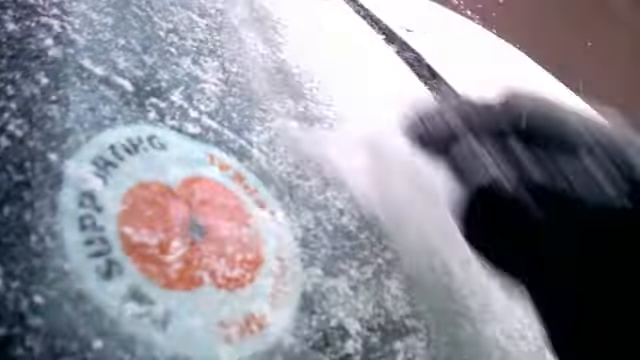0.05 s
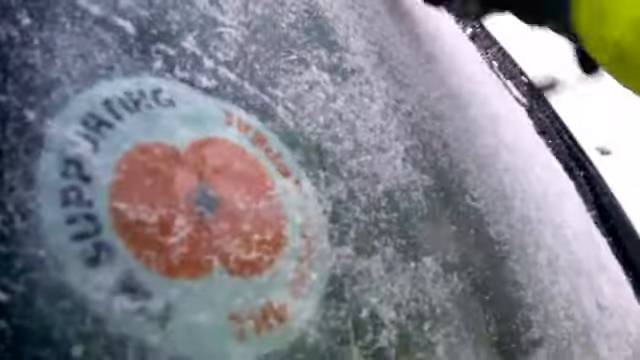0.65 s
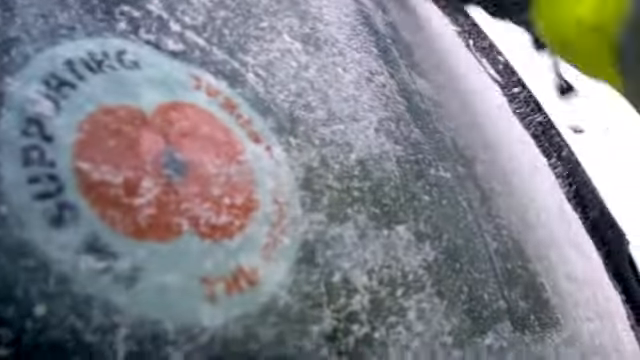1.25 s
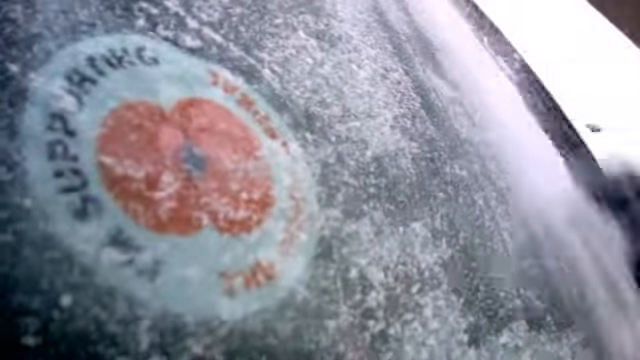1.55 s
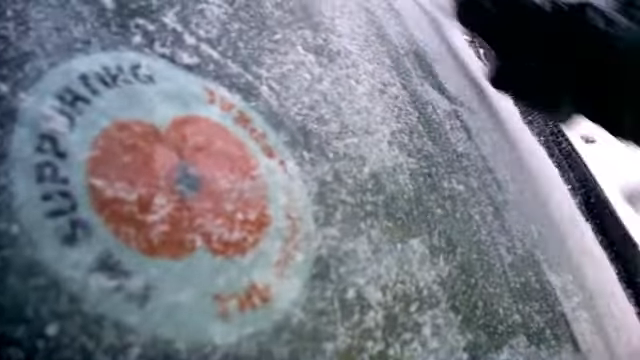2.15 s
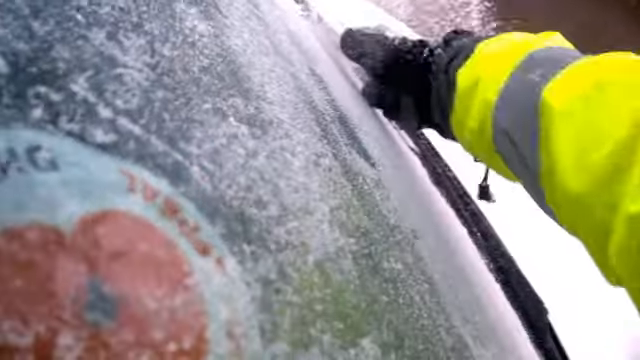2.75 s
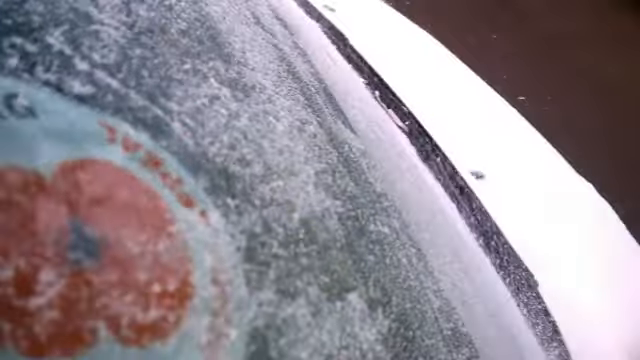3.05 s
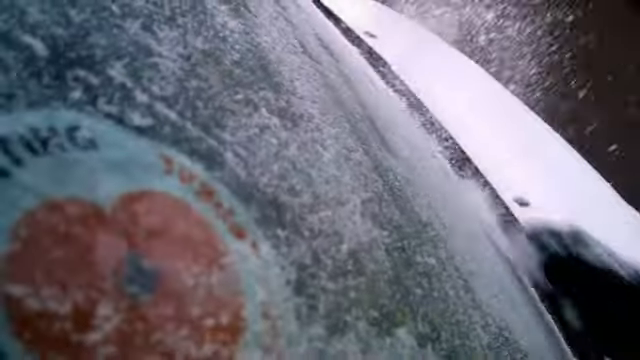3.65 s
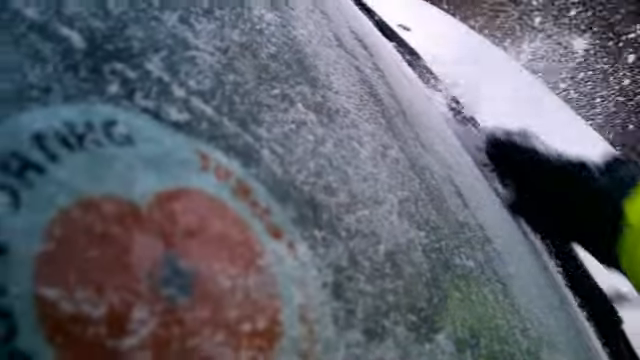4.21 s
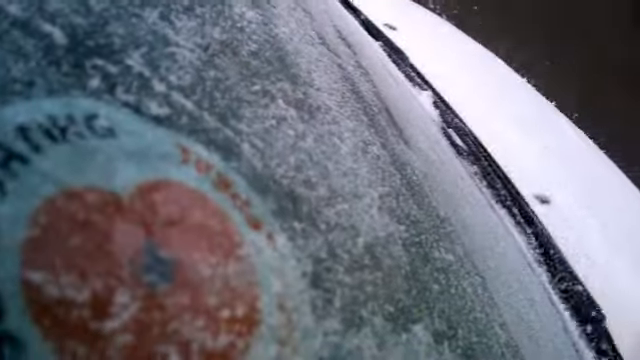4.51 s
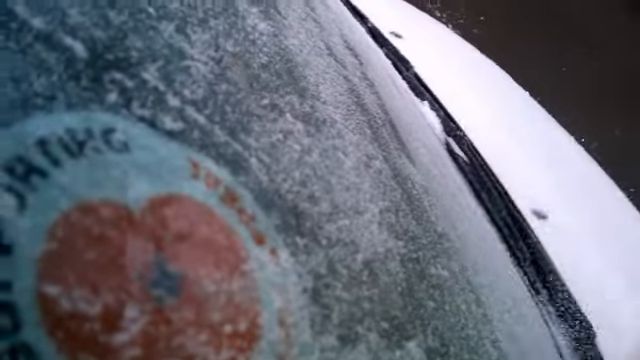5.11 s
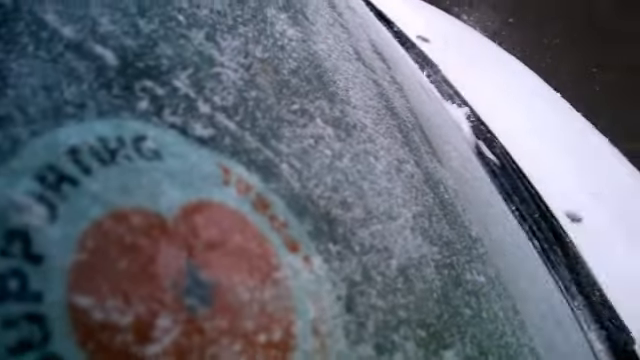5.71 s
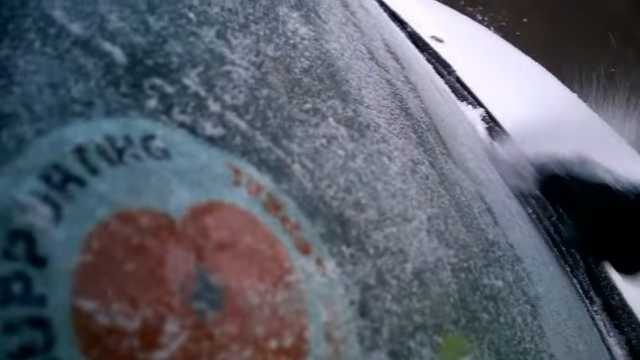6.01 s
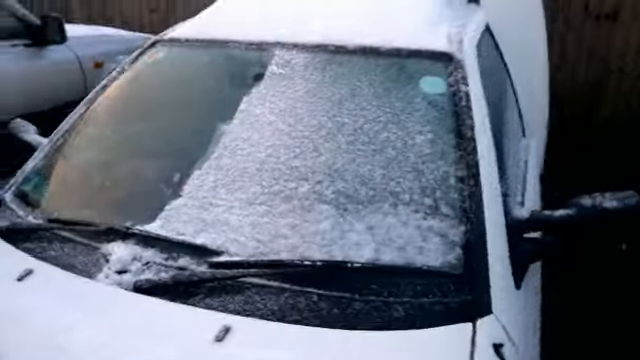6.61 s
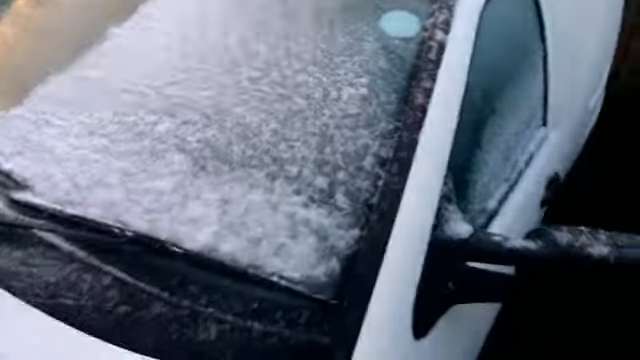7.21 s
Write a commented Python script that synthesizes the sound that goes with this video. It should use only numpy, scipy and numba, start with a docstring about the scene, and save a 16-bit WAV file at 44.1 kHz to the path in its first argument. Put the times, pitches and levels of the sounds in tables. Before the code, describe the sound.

A plastic scraper rasps frost off a windscreen in quick strokes and jabs, then stops, leaving the car's engine idling.

```python
"""Scraping frost off a windscreen

A plastic scraper works close by on an idling car: quick back-and-forth strokes, then grittier jabs. Countless
tiny breaks in the frost make the crunch and set the blade and the glass ringing. After six seconds the scene
changes: the scraping is gone and the engine is heard alone, from in front of the bonnet."""
import sys
import numpy as np
from scipy import signal
from scipy.fft import rfft, irfft
from scipy.io import wavfile
from scipy.ndimage import uniform_filter1d, map_coordinates
from numba import njit

SR = 44100
rng = np.random.default_rng(int(sys.argv[2]) if len(sys.argv) > 2 else 0)


def int16_out(signal):
    """Quantize to a 16-bit WAV file."""
    q = np.round(np.clip(np.atleast_2d(signal).T, -1, 1) * 32767)
    wavfile.write(sys.argv[1], SR, q.astype(np.int16))


N = 324576
TIME = np.arange(N) / SR

# the engine's two lowest tones: time_s, firing_tone_db, octave_db
ENGINE_HUM = [(0.5, -30, -29.5), (3.2, -36, -32.5), (6.03, -38, -33.5), (6.09, -38, -40), (6.52, -37, -49),
              (7.36, -32.5, -31.5)]
# its higher tones: multiple_of_firing_rate, by_windscreen_db, by_bonnet_db
ENGINE_OVERTONES = [(3, -49, -42), (4, -62, -44), (5, -59, -53), (6, -57, -59), (7, -57.5, -55),
                    (8, -54.5, -51), (9, -60, -54), (12, -55.5, -62), (14, -55, -53.5), (16, -55, -78)]
# tone colours (how strong the low and high parts are): pitch_hz, relative_db
WHIRR_COLOUR = [(80, -28), (200, -1.5), (420, -4), (720, -4.5), (1100, -4.5), (1700, -8), (2000, -14),
                (2400, -11), (3200, -18.5), (8000, -18), (12000, -19), (13200, -32), (15500, -33)]  # belts, fan and valves
RUMBLE_COLOUR = [(10, -8), (30, 16.5), (70, 3), (140, -11), (400, -13), (2000, -72)]
PUFF_COLOUR = [(30, 1), (90, -1), (220, -4.5), (500, -14), (2000, -57)]
KNOCK_COLOUR = [(50, -24), (140, 2), (280, -5), (600, -22), (2000, -60)]
FROST_STROKE_COLOUR = [(1500, -30), (3000, -8), (3900, 5), (4700, 3.5), (6000, -0.5), (7000, 0.5),
                       (7900, -3.5), (8900, 2.5), (10200, -2), (11300, 0.5), (12200, -5.5), (15500, -12.5)]
FROST_JAB_COLOUR = [(1500, -14.5), (3000, -10), (4000, 0.5), (5000, 6), (5700, 2.5), (6600, 2), (7500, 0),
                    (8500, 2.5), (10400, 0.5), (11400, -1), (12300, -6), (15500, -12.5)]
GLASS_STROKE_COLOUR = [(70, -19.5), (160, -23.5), (280, -7.5), (450, 0), (600, 1), (800, 7), (1080, -0.5),
                       (1400, -3), (1900, -6), (3500, -40)]
GLASS_JAB_COLOUR = [(70, -21), (160, -19), (260, -6), (420, -0.5), (620, -1.5), (830, 4), (1080, 2),
                    (1400, -4), (1900, -9.5), (3500, -47.5)]  # jabs press harder and bend the glass more
# short, single events: start_s, relative_db
AIR_PUFFS = [(.072, -11.5), (.099, -10), (.142, -11)]
SCRAPER_KNOCKS = [(4.79, -23.5), (4.806, -33)]  # against the foot of the windscreen
ICE_CHIPS = [(0.626, -7), (0.6474, -1.5), (3.563, -12), (3.8905, -15.5), (4.3088, -4), (4.3894, -4),
             (4.418, -6), (4.5351, -18), (4.7158, -7), (4.7372, -7), (4.7681, -12), (4.791, -14.5),
             (4.8043, -22), (4.8628, -26.5), (4.997, -21), (5.0205, -12.5), (5.051, -21), (5.594, -14)]  # lumps that crack off
# the grip tunes the blade's ring: time_s, pitch_hz, width_hz
BLADE_TUNING = [(1.2, 2040, 1460), (2.2, 2260, 1350), (2.9, 2380, 1220), (3.4, 2390, 1060),
                (3.7, 2480, 620), (5.15, 2470, 557), (5.63, 2830, 720), (6.05, 2450, 910)]
# In the three stroke tables, levels are relative; blade_db and glass_db set each part's share.
# long strokes up: start_s, end_s, level_db, swell_db, blade_db, glass_db, boom_db, far_echo_ms
PUSH_STROKES = [(0.254, 0.637, -7.5, 8.5, -5, -7, -28, 0.17),
                (1.006, 1.391, -8.5, 9.5, -4, -8, -21.5, 0.18), (1.727, 2.105, -10, 9, -4, -6.5, -21, .17),
                (2.432, 2.818, -13.5, 11.5, -1.5, -6.5, -19.5, 0.15),
                (3.153, 3.552, -12, 14, -2, -4.5, -20, .095)]
# long strokes down: start_s, end_s, fade_in_s, level_db, blade_db, glass_db, edge_db, far_echo_ms
PULL_STROKES = [(-0.12, 0.252, 0.055, -6, -4.5, -14, -32, 0.21),
                (0.632, 1.004, 0.081, -7, -4.5, -19.5, -27, 0.23),
                (1.39, 1.733, 0.049, -7, -7, -20, -12, .21), (2.108, 2.439, 0.046, -8, -7, -18, -16, 0.18),
                (2.817, 3.162, .075, -9, -5.5, -20.5, -29, 0.15)]
# short jabs: start_s, end_s, fade_in_s, fade_out_s, level_db, blade_db, glass_db, uneven_db
JAB_STROKES = [(3.561, 3.702, 0.074, .03, -13, -7, -22, 2), (3.671, 3.897, 0.05, 0.16, -10.5, -5.5, -14, 2),
               (3.913, 4.002, 0.046, 0.026, -26, 0, -1, 1), (3.981, 4.171, 0.016, 0.03, -16.5, -1.5, -6, 3),
               (4.161, 4.228, 0.011, 0.038, -28, 3, 1, 3.5),
               (4.245, 4.324, 0.033, .01, -23, -3.5, -9.5, 2.5),
               (4.311, 4.414, .012, 0.027, -12.5, -5, -21, 0.5),
               (4.398, 4.528, .008, 0.03, -18, -8, -8.5, 1.2), (4.49, 4.690, 0.19, .01, -25, -2.5, -5.5, 3),
               (4.665, 4.745, 0.022, 0.03, -14, -1.5, -5.5, 4.5),
               (4.720, 4.908, .02, 0.2, -23.5, 2.5, -3, 4),
               (4.963, 5.095, 0.14, .01, -25.5, -7.5, -21, 5.5),
               (5.078, 5.254, 0.015, 0.15, -8, -5.5, -12, 1.9),
               (5.319, 5.367, 0.0061, .01, -33.5, 5, 1.5, 4),
               (5.342, 5.587, 0.017, 0.087, -21.5, 1, -4.5, 1.5),
               (5.58, 5.745, 0.068, 0.033, -19, -0.5, -21, 1),
               (5.698, 5.845, 0.066, 0.058, -16.5, -3, -7, 0.6),
               (5.843, 5.891, 0.013, 0.026, -16, -6, -14, 3.8),
               (5.886, 5.944, 0.016, 0.025, -30, -2, -2.5, 5),
               (5.94, 6.075, 0.044, 0.01, -21, 2.5, -0.5, 1.7)]

SCENE_CHANGE_S = 6.068  # the scene changes to the front of the car
PUSH_FADE_IN_S, PUSH_FADE_OUT_S, PULL_FADE_OUT_S = 0.023, 0.035, 0.042
NEAR_ECHO_MS = 0.092  # delay of the echo off the glass with the arm drawn in
STROKE_UNEVEN_DB = 1.0  # how unevenly thick frost breaks under long strokes


def undb(db):
    """Turn decibels into a number to multiply by."""
    return 10 ** (np.asarray(db) / 20)


def unit(x):
    """Scale a signal to an average power of 1."""
    return x / np.sqrt(np.mean(x ** 2))


def curves(rows):
    """Join each column of a table with straight lines over time."""
    times, *columns = np.transpose(rows)
    return [np.interp(TIME, np.sort(times), column) for column in columns]


def colour(x, points):
    """Give a sound a tone colour; white noise keeps its power."""
    hz, db = np.transpose(points)
    bin_hz = np.arange(N // 2 + 1) * SR / N
    gain = undb(np.interp(np.log(bin_hz + 1), np.log(hz), db))
    cepstrum = irfft(np.log(unit(gain)), N)
    cepstrum[1:N // 2] *= 2  # folded so the filter rings after a click, never before
    cepstrum[N // 2 + 1:] = 0
    return irfft(rfft(x) * np.exp(rfft(cepstrum)), N)


def wander(rate):
    """A smooth random wobble of about 1 that changes about rate times a second."""
    steps = rng.standard_normal(N // 16)
    return unit(map_coordinates(steps, [TIME * rate], order=2, mode="wrap"))


@njit
def resonate(x, hz, width_hz):
    """Make a sound ring at a pitch that can move; a smaller width rings longer."""
    out, band, low = np.empty(len(x)), 0., 0.
    for i in range(len(x)):
        tuning, damping = np.tan(np.pi * hz[i] / SR), width_hz[i] / hz[i]
        ring = (band + tuning * (x[i] - low)) / (1 + tuning * (tuning + damping))
        band, low = 2 * ring - band, low + 2 * tuning * ring
        out[i] = damping * ring * np.sqrt(SR / (np.pi * width_hz[i]))
    return out


def bursts(rows, decay_s):
    """A short, fading spray of noise for each row."""
    out, t = np.zeros(N + 4096), TIME[:4096]
    for start_s, db in rows:
        i = int(start_s * SR)
        out[i:i + len(t)] += undb(db) * rng.standard_normal(len(t)) * np.exp(-t / decay_s)
    return out[:N]


def engine(firing_hz=30.47, whirr_screen_db=-46, whirr_bonnet_db=-40.5, throb=0.16, rise_db_per_s=4):
    """Four cylinders idle: a deep hum, a rumble and a whirr that pulses with each firing."""
    firing_db, octave_db = curves(ENGINE_HUM)
    phase = 2 * np.pi * np.cumsum(firing_hz * (1 + 0.0074 * wander(12))) / SR
    at_bonnet = np.clip((TIME - SCENE_CHANGE_S) / 0.0031, 0, 1)
    tones = [(1, firing_db), (2, octave_db)]
    for k, screen_db, bonnet_db in ENGINE_OVERTONES:
        tones.append((k, screen_db + at_bonnet * (bonnet_db - screen_db) + 2 * wander(6.8)))
    hum = np.sqrt(2) * sum(undb(db) * np.sin(k * phase + rng.uniform(0, 2 * np.pi)) for k, db in tones)
    whirr = colour(rng.standard_normal(N), WHIRR_COLOUR)
    whirr *= (1 + throb * np.cos(phase)) * undb(wander(57))
    whirr_db = whirr_screen_db + at_bonnet * (whirr_bonnet_db - whirr_screen_db)
    whirr_db += rise_db_per_s * np.maximum(TIME - 6.6, 0)  # the listener moves towards the car's wing
    rumble = colour(rng.standard_normal(N), RUMBLE_COLOUR)
    return hum + undb(whirr_db) * whirr + undb(-40.5) * rumble


def thuds():
    """The passing arm pushes air at the microphone, and the scraper bumps the car."""
    air = colour(bursts(AIR_PUFFS, decay_s=0.0059), PUFF_COLOUR)
    knocks = colour(bursts(SCRAPER_KNOCKS, decay_s=0.02), KNOCK_COLOUR)
    return air + knocks


def stroke(start, end, fade_in_s, fade_out_s):
    """One move of the hand: its samples, its progress from 0 to 1 and its strength."""
    i = np.arange(max(int(start * SR), 0), int(end * SR))
    t = TIME[i]
    fade_in = np.clip((t - start) / fade_in_s, 0, 1)
    fade_out = np.clip((end - t) / fade_out_s, 0, 1) ** 1.12  # the hand slows
    return i, (t - start) / (end - start), fade_in * fade_out


def pushes(hardest_at=0.57, blade_fall_db=6, glass_fall_db=7, bite_db=1.4):
    """Going up, the blade digs in and slowly flattens; the crunch swells near the middle."""
    for start, end, db, swell_db, blade_db, glass_db, _, far_ms in PUSH_STROKES:
        i, progress, gain = stroke(start, end, PUSH_FADE_IN_S, PUSH_FADE_OUT_S)
        effort = gain * undb(db - swell_db * (2 * (progress - hardest_at)) ** 2)
        blade_db = blade_db - blade_fall_db * (progress - .5) + bite_db * np.sin(np.pi * progress) ** 4
        glass_db = glass_db - glass_fall_db * (progress - .5)
        echo_ms = NEAR_ECHO_MS + (far_ms - NEAR_ECHO_MS) * np.sin(np.pi * progress / 2) ** 2
        yield i, effort, blade_db, glass_db, echo_ms, STROKE_UNEVEN_DB


def pulls(arch_db=9):
    """Coming back, the blade skates with a steady, bright hiss and is loaded most half-way."""
    for start, end, fade_in_s, db, blade_db, glass_db, _, far_ms in PULL_STROKES:
        i, progress, gain = stroke(start, end, fade_in_s, PULL_FADE_OUT_S)
        blade_db = blade_db - arch_db * (2 * progress - 1) ** 2
        echo_ms = NEAR_ECHO_MS + (far_ms - NEAR_ECHO_MS) * np.cos(np.pi * progress / 2) ** 2
        yield i, gain * undb(db), blade_db, glass_db, echo_ms, STROKE_UNEVEN_DB


def jabs(echo_ms=0.095):
    """Each jab at the edge of the glass keeps one tilt of the blade and stays close by."""
    for start, end, fade_in_s, fade_out_s, db, blade_db, glass_db, uneven_db in JAB_STROKES:
        i, _, gain = stroke(start, end, fade_in_s, fade_out_s)
        yield i, gain * undb(db), blade_db, glass_db, echo_ms, uneven_db


def hand(turn_db=-37.5, rest_db=-48, rub_blade_db=-4, rub_glass_db=-6):
    """Blend all strokes into curves that steer the scraper; where two meet, the stronger leads."""
    # the blade rubs on as it turns round, and barely touches between jabs
    power = undb(np.where(TIME < JAB_STROKES[0][0], turn_db, rest_db)) ** 2
    controls = np.outer([rub_blade_db, rub_glass_db, NEAR_ECHO_MS, STROKE_UNEVEN_DB], power)
    for i, effort, *values in [*pushes(), *pulls(), *jabs()]:
        power[i] += effort ** 2
        for control, value in zip(controls, values):
            control[i] += value * effort ** 2
    return np.sqrt(power), *(controls / power)


def fractures(uneven_db, per_second=9000, spread_db=2.5, powder_db=-5):
    """Frost crystals snap in clusters as the blade sticks and slips; powder hisses in between."""
    sizes = undb(spread_db * np.minimum(rng.exponential(size=N), 6))
    snaps = unit(sizes * rng.choice([-1, 1], N) * (rng.random(N) < per_second / SR))
    slip = unit(wander(650) + 0.78 * wander(170) + 0.39 * wander(41))
    grab = undb(uneven_db * np.minimum(slip, 2.6))
    grab /= np.sqrt(uniform_filter1d(grab ** 2, SR // 20))  # the arm keeps the average effort
    return unit(snaps + undb(powder_db) * rng.standard_normal(N)) * grab


def shimmer(x, span_ms, share, rate, count=16):
    """Waves run to and fro in blade and glass: short echoes that swell and cancel as the blade moves."""
    paths = (np.arange(count) + .5 + rng.random(count)) / count
    echoes = sum(np.roll(x, int(p * span_ms * SR / 1000)) * wander(rate) * np.exp(-p) for p in paths)
    echoes /= np.sqrt(np.sum(np.exp(-2 * paths)))
    return (x + share * echoes) / np.sqrt(1 + share ** 2)


def glass_echo(x, echo_ms, share=0.24, wedge_db=-12, wedge_width_hz=900.):
    """An echo off the glass sweeps the tone; the air wedge under the blade rings, most at full reach."""
    echo = map_coordinates(x, [np.arange(N) - echo_ms * SR / 1000], order=3)
    swept = (x + share * echo) / np.sqrt(1 + share ** 2)
    reach = np.clip((echo_ms - .1) / .12, 0, 1)
    wedge = undb(wedge_db) * reach * resonate(x, 1000 / echo_ms, np.full(N, wedge_width_hz))
    return (swept + wedge) / (1 + .5 * reach)


def glass_boom(force, pitch_hz=250., width_hz=130.):
    """The weight of each push makes the whole windscreen boom."""
    load = np.zeros(N)
    for start, end, *_, boom_db, _ in PUSH_STROKES:
        i, _, gain = stroke(start, end, PUSH_FADE_IN_S, PUSH_FADE_OUT_S)
        load[i] = undb(boom_db) * gain
    return resonate(force * load, np.full(N, pitch_hz), np.full(N, width_hz))


def glass_ring(force, glass_db, pitch_hz=1014., width_hz=210., gain_db=-2.5):
    """The windscreen's main note stands out only when the blade presses squarely on it."""
    drive = force * undb(gain_db) * undb(glass_db) ** 2
    return resonate(drive, np.full(N, pitch_hz), np.full(N, width_hz))


def glass_bending(force, glass_db, jab_mix):
    """The snaps bend the windscreen, which gives the scrape its low body."""
    bending = shimmer(force, span_ms=12, share=1.0, rate=16) * undb(glass_db)
    stroked, jabbed = colour(bending, GLASS_STROKE_COLOUR), colour(bending, GLASS_JAB_COLOUR)
    return (1 - jab_mix) * stroked + jab_mix * jabbed


def edge_ring(force, start_hz=4690, end_hz=3700, width_hz=270.):
    """The dragged edge sings during each pull, sinking in pitch."""
    out = np.zeros(N)
    for start, end, fade_in_s, *_, edge_db, _ in PULL_STROKES:
        i, progress, _ = stroke(start, end, fade_in_s, PULL_FADE_OUT_S)
        pitch_hz = start_hz + (end_hz - start_hz) * progress
        out[i] = undb(edge_db) * resonate(force[i], pitch_hz, np.full(len(i), width_hz))
    return out


def blade_ring(force, wobble=0.029):
    """The plastic blade rings at a pitch set by the grip."""
    pitch_hz, width_hz = curves(BLADE_TUNING)
    drive = shimmer(force, span_ms=5, share=0.56, rate=20)
    ring = resonate(drive, pitch_hz * (1 + wobble * wander(26)), width_hz)
    return signal.sosfilt(signal.butter(2, [1250, 3600], "band", fs=SR, output="sos"), ring)


def frost_crunch(force, jab_mix):
    """The bright sound of the snaps, carried straight through the air."""
    crunch = shimmer(force, span_ms=1.6, share=0.61, rate=24)
    stroked, jabbed = colour(crunch, FROST_STROKE_COLOUR), colour(crunch, FROST_JAB_COLOUR)
    return (1 - jab_mix) * stroked + jab_mix * jabbed


def scraper(frost_gain_db=1.0, blade_gain_db=1.5, glass_gain_db=-3.4, chip_gain_db=-3):
    """Breaking frost is heard directly and through the plastic blade and the windscreen."""
    effort, blade_db, glass_db, echo_ms, uneven_db = hand()
    jab_mix = np.clip((TIME - 2.93) / 0.25, 0, 1)  # the jab colours come in ahead of the last push
    force = fractures(uneven_db) * effort + undb(chip_gain_db) * bursts(ICE_CHIPS, decay_s=0.0041)
    frost = undb(frost_gain_db) * glass_echo(frost_crunch(force, jab_mix), echo_ms)
    blade = undb(blade_gain_db + blade_db) * blade_ring(force)
    glass = undb(glass_gain_db) * glass_bending(force, glass_db, jab_mix)
    rings = edge_ring(force) + glass_ring(force, glass_db) + glass_boom(force)
    # the blade's wave is flipped so its ring adds to the crunch and glass without a hollow gap
    return frost + rings - blade + glass


def scene():
    """Scraper, engine and thuds, the same in both ears."""
    scraping_on = np.clip((SCENE_CHANGE_S - TIME) / 0.00058, 0, 1)
    mono = scraper() * scraping_on + engine() + thuds()
    return np.array([mono, mono])


def record(dry, ceiling=0.84, top_hz=15700):
    """The loudest strokes overload the microphone, and the highest treble is cut."""
    treble_cut = signal.ellip(10, .1, 70, top_hz, fs=SR, output="sos")
    return signal.sosfilt(treble_cut, np.clip(dry, -ceiling, ceiling))


dry = scene()
out = record(dry)
int16_out(out)
```